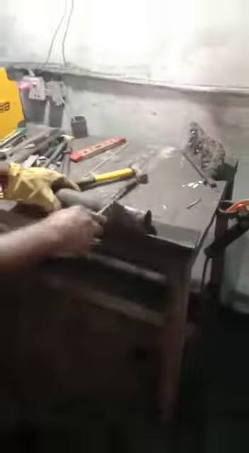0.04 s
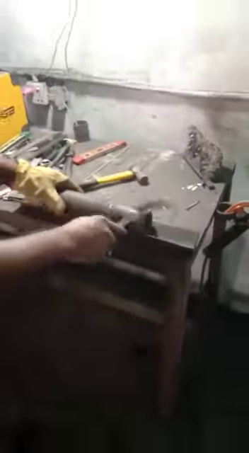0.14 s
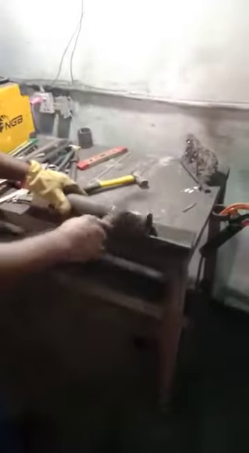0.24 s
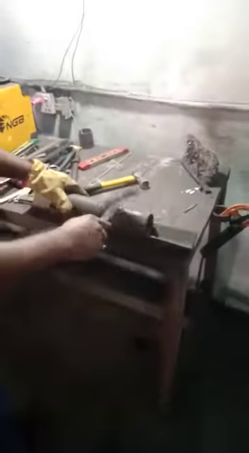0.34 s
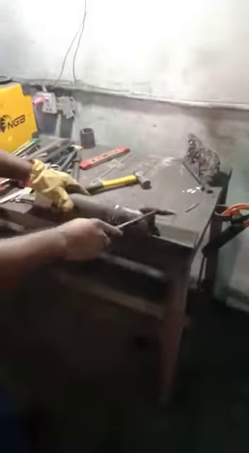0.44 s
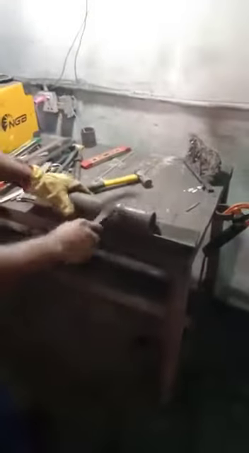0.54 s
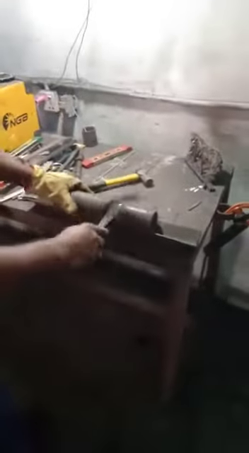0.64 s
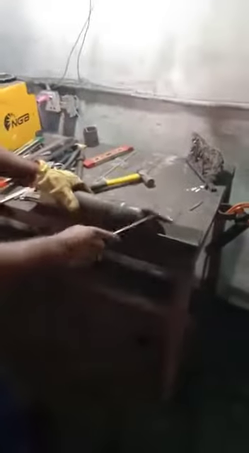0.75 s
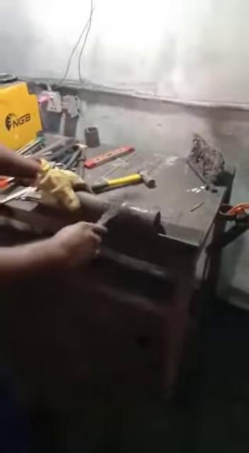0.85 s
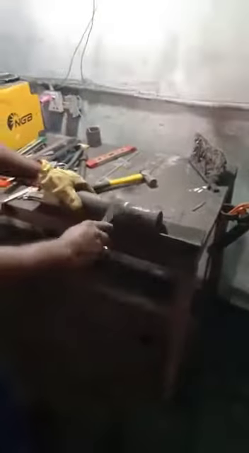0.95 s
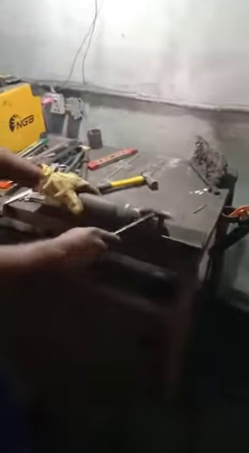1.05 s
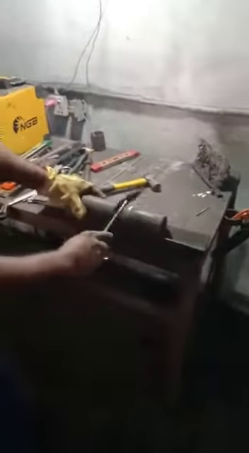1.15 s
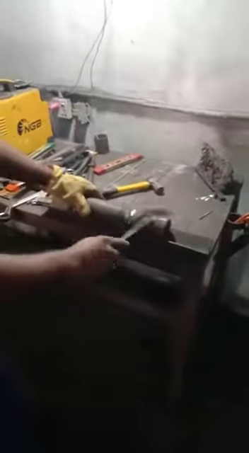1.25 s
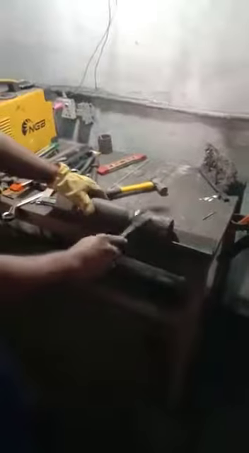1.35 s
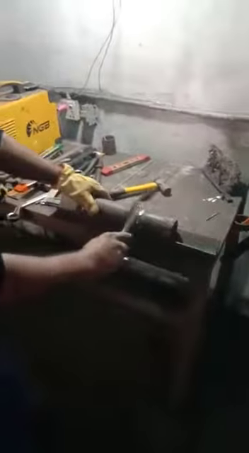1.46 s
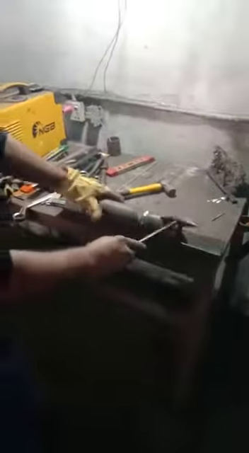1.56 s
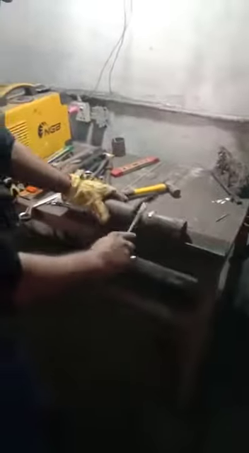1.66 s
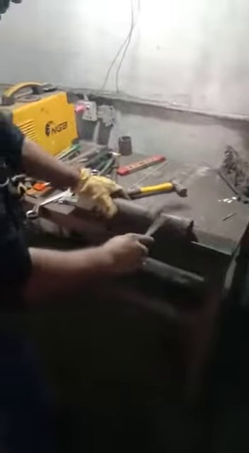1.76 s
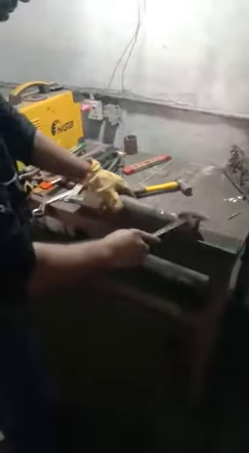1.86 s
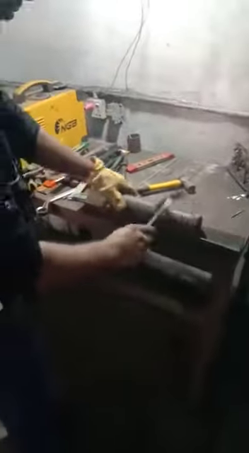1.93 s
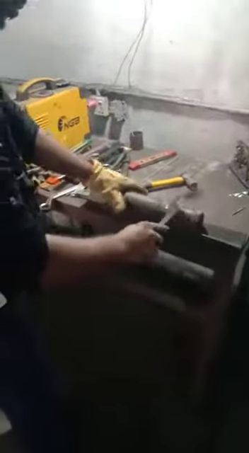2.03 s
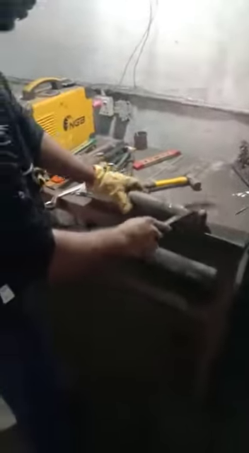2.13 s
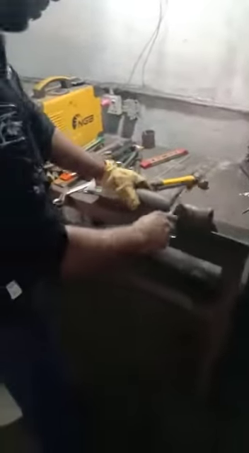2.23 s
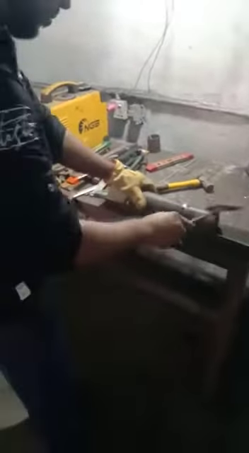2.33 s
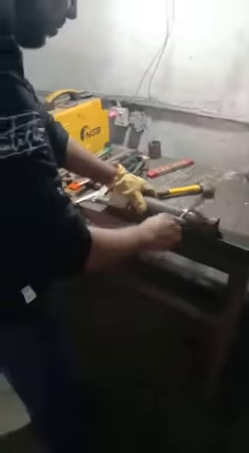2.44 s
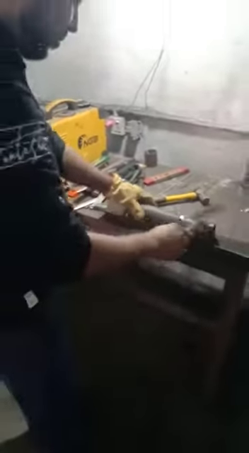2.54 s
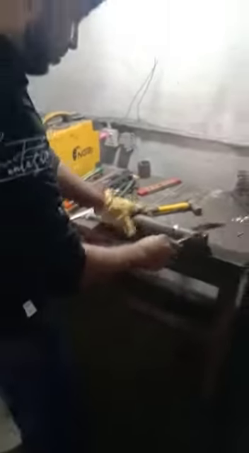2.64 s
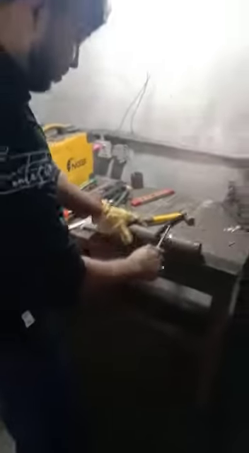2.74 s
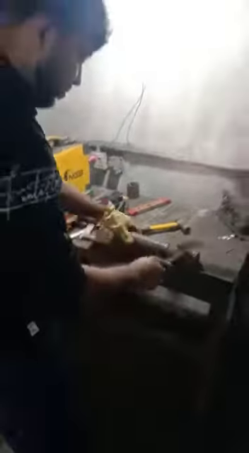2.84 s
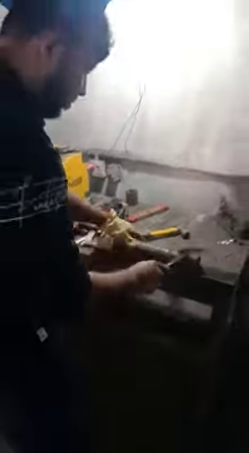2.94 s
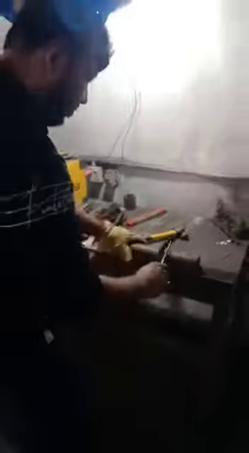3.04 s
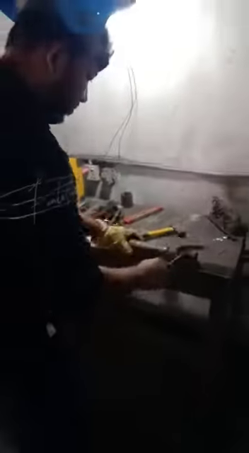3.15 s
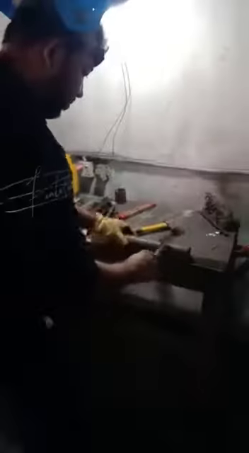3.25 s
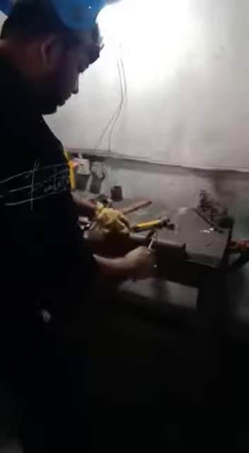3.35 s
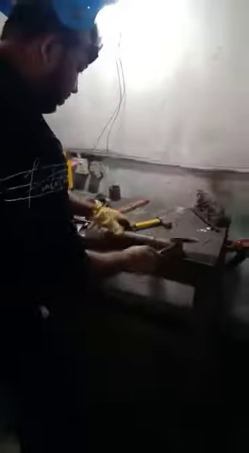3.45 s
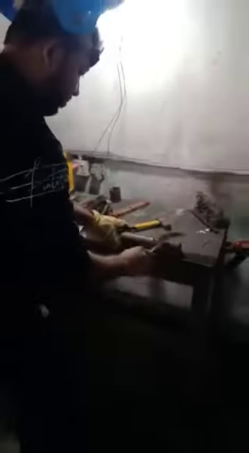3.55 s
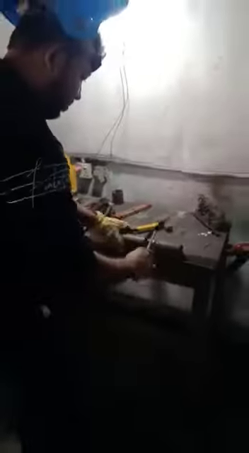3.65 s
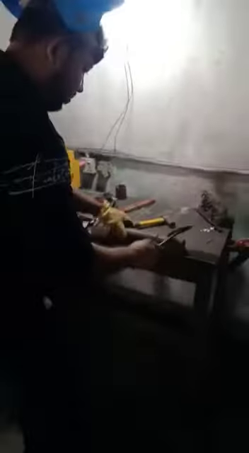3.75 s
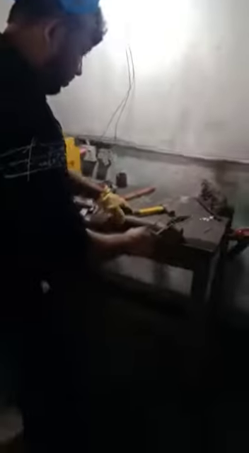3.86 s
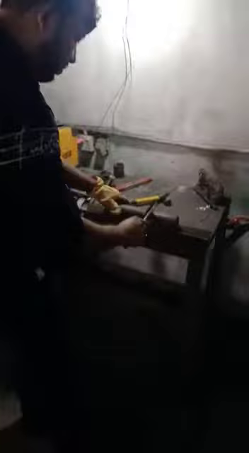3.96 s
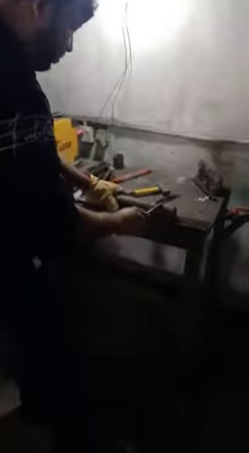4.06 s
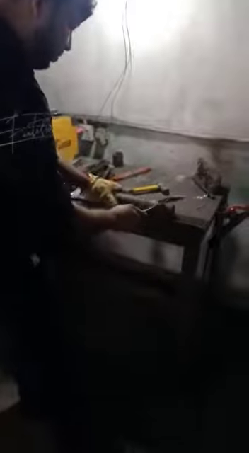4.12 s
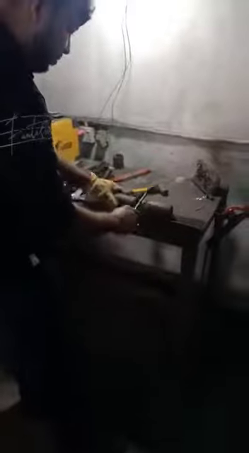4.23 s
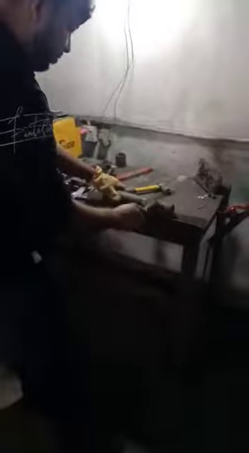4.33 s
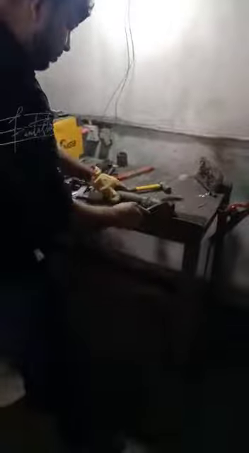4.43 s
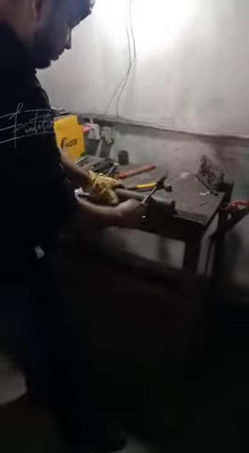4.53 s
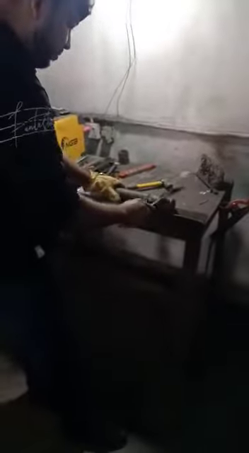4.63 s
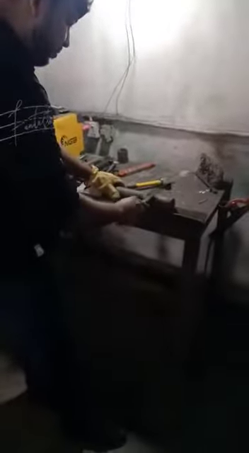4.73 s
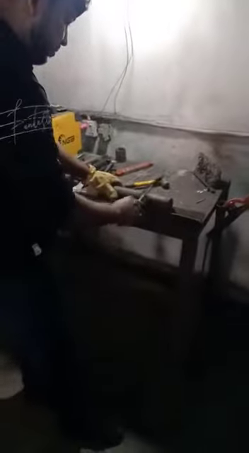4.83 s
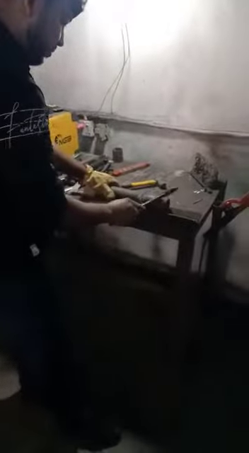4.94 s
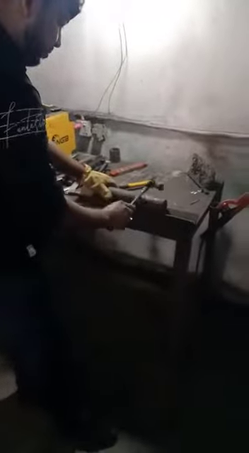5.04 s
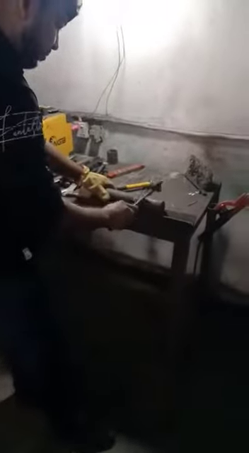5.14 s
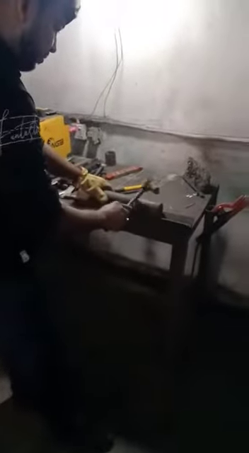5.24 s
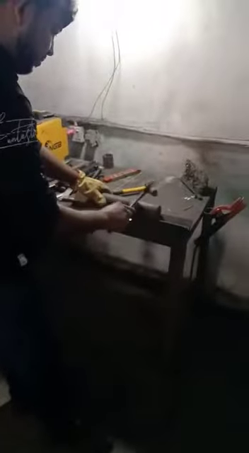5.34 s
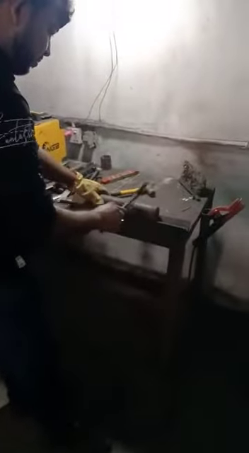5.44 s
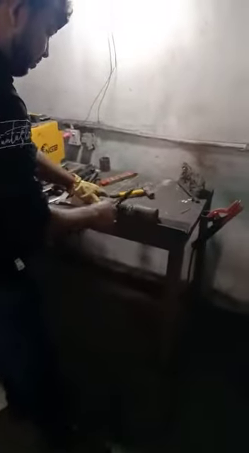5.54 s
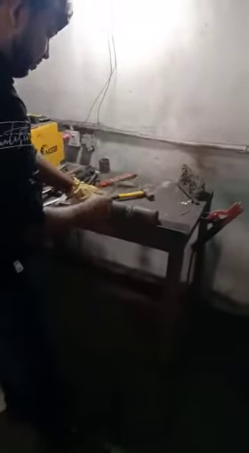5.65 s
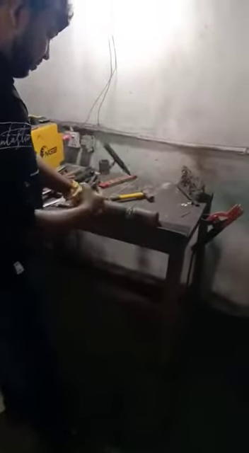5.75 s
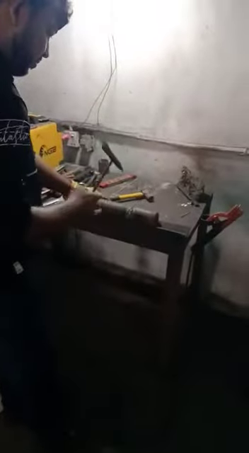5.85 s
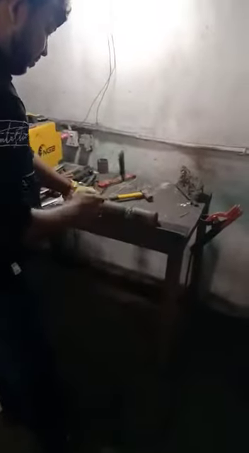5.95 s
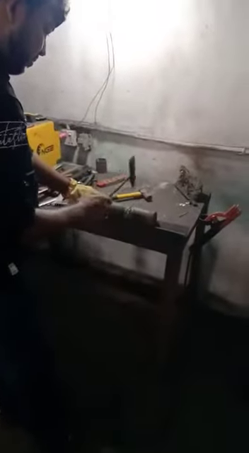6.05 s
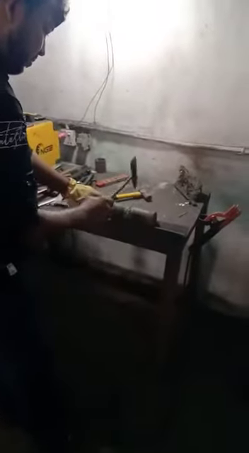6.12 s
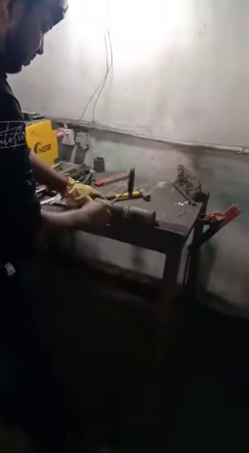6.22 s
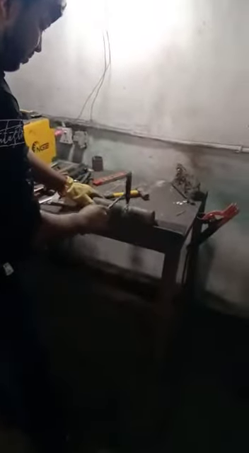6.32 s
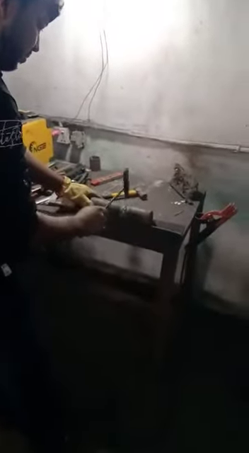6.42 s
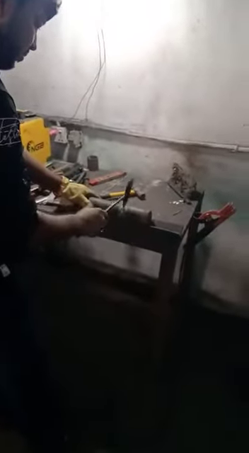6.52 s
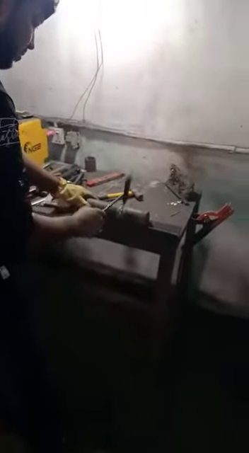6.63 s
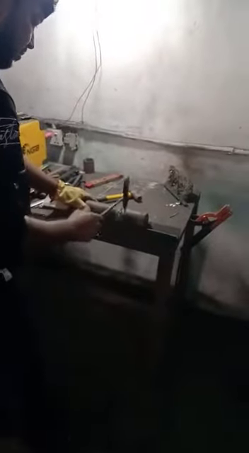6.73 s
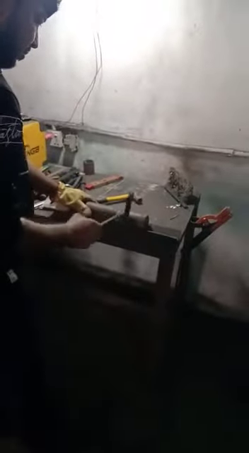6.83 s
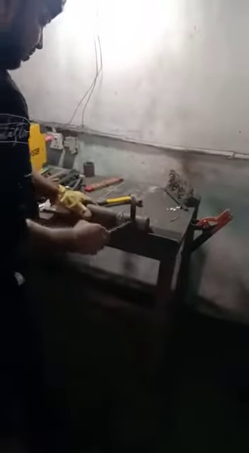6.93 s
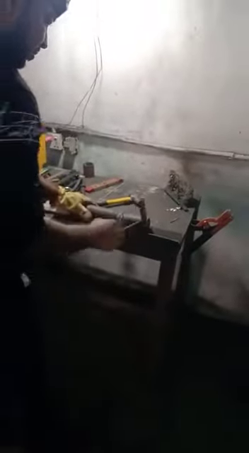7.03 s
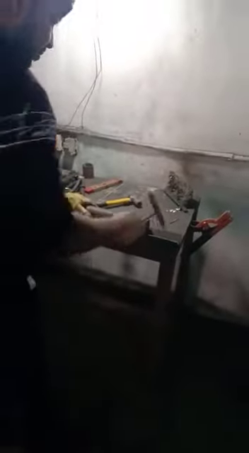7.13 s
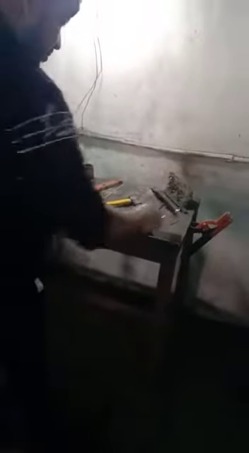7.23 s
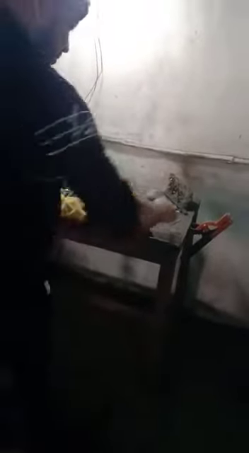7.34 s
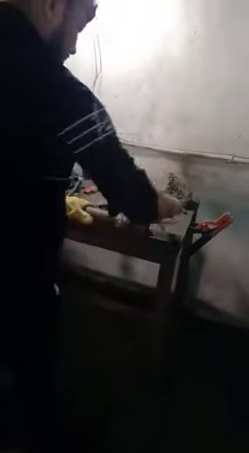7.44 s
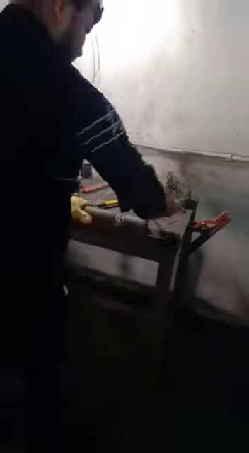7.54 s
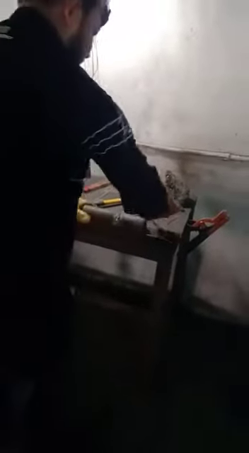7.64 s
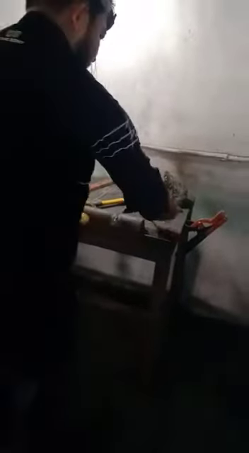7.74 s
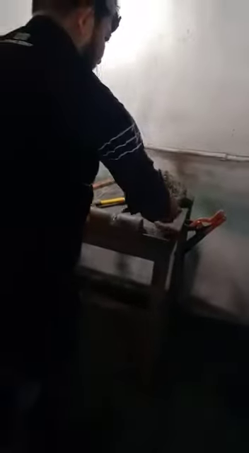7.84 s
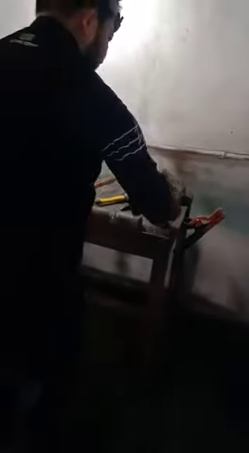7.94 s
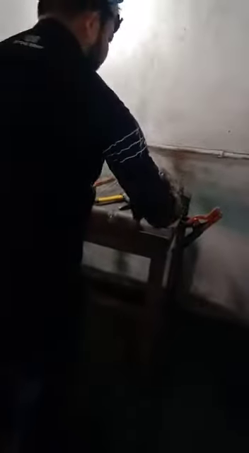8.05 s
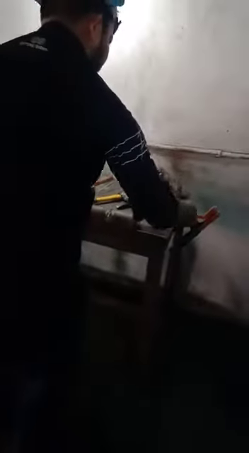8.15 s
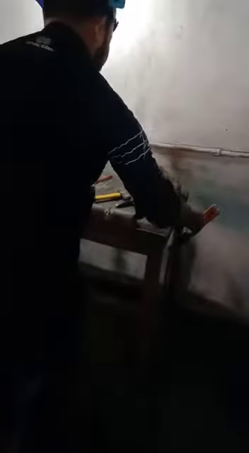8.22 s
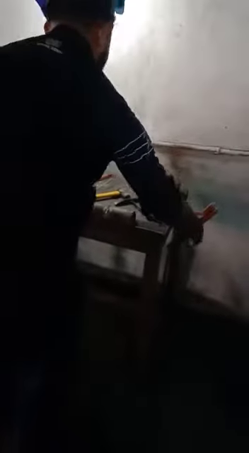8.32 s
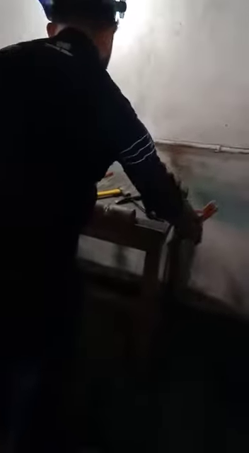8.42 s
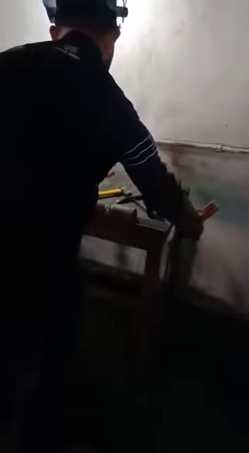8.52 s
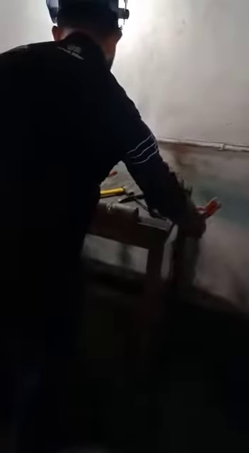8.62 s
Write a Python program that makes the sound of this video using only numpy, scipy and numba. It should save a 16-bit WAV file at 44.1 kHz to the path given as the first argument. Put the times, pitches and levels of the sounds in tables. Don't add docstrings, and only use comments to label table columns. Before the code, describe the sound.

Fast gritty metal scraping and tapping with bright steel ringing, a pause, two hard blows, then a tool clattering down over faint fan hiss.

```python
import sys
import numpy as np
from scipy import signal
from scipy.fft import rfft, irfft
from scipy.io import wavfile
from scipy.ndimage import uniform_filter1d
from numba import njit

SR = 44100
rng = np.random.default_rng(int(sys.argv[2]) if len(sys.argv) > 2 else 0)


def natural_amplitude(level_db):
    exponent = np.asarray(level_db, float) / 20
    return 10 ** exponent


def persist_wave(psi):
    counts = np.round(np.clip(psi, -1, 1) * 32767).astype(np.int16)
    wavfile.write(sys.argv[1], SR, np.atleast_2d(counts).T)


N = 382788

# pitch_hz, level_db
MIC = [(30, -28), (70, -14.5), (120, -3), (1000, -7), (1250, 3.5), (1550, -1.5), (3500, 9), (6200, 14),
       (7400, 16), (8600, 5), (10000, -9), (13000, -15.5), (15000, -3), (16000, -4)]


def shape(table, hz):
    at, value = np.transpose(table)
    return np.interp(np.log(np.maximum(hz, 1)), np.log(at), value)


def unit(x):
    return x / np.sqrt(np.mean(x ** 2))


def colour(x, table):
    size = 4096
    cep = irfft(np.log(natural_amplitude(shape(table, np.fft.rfftfreq(size, 1 / SR)))))
    cep[1:size // 2] *= 2
    cep[size // 2 + 1:] = 0
    return signal.fftconvolve(x, irfft(np.exp(rfft(cep))))[:N]


@njit
def ring(x, which, gains, poles):
    y = np.zeros(len(x))
    for m in range(poles.shape[1]):
        z = 0j
        for i in range(len(x)):
            z = z * poles[which[i], m] + gains[which[i], m] * x[i]
            y[i] += z.imag
    return y


def body(x, which, modes, contact_db, detune=0):
    hz, width, db = np.transpose(modes)
    radius = np.exp(-np.pi * width / SR)
    gains = natural_amplitude(contact_db + db - shape(MIC, hz)) * np.sqrt(1 - radius ** 2)
    tuned = hz * (1 + detune * rng.standard_normal(gains.shape))
    return ring(x + 1e-18, which, gains, radius * np.exp(2j * np.pi * tuned / SR))


def contact(table, grit_db):
    force, which = np.zeros(N), np.zeros(N, np.int64)
    for k, (s, db, rise_ms, fall_ms, *_) in enumerate(table):
        start = int(s * SR)
        ms = np.arange(min(N - start, SR // 3)) * 1000 / SR
        rise = np.sin(np.pi / 2 * np.clip(ms / max(rise_ms, 1), 0, 1))
        lift = np.exp(-(np.maximum(ms - rise_ms, 0) / max(1.346 * fall_ms, 2)) ** 1.04)
        force[start:start + len(ms)] += natural_amplitude(db) * rise ** 0.66 * lift
        which[start:] = k
    size = np.minimum(rng.exponential(size=N // 16 + 1), 3)
    grains = rng.standard_normal(N) * natural_amplitude(grit_db * np.repeat(size, 16)[:N])
    return force * unit(grains), which


def favoured(table, modes):
    octaves = abs(np.log2(np.array(modes)[:, 0] / np.array(table)[:, -1:]))
    nearest = octaves == octaves.min(axis=1, keepdims=True)
    return 10.5 * nearest


def struck(table, modes, scatter_db, ring_db, top_db, grit_db, lie_db=0):
    crunch, which = contact(table, grit_db)
    own_db, hz = np.array(table)[:, -2:-1], np.array(modes)[:, 0]
    group_db = own_db * np.where(hz < 8000, 1, .5) + top_db * (hz > 9500)
    scatter = scatter_db * np.where(hz < 9500, 1, 2) * rng.standard_normal((len(table), len(modes)))
    drive_db = ring_db + group_db + favoured(table, modes) + lie_db + scatter
    return crunch, body(crunch, which, modes, drive_db, detune=.002)


def strokes():
    # start_s, crunch_db, bite_ms, pipe_ring_db, favoured_mode_hz
    taps = [(0.0, -15, 13, -2, 7340), (0.095, -21, 5.1, -6.5, 2870), (0.689, -22, 32, -0.5, 7690),
            (0.831, -11.5, 22.6, -8.5, 2870), (0.962, -23, 53, -2, 3660), (1.091, -21.5, 64, 1, 7340),
            (1.363, -16.5, 31, -5, 7400), (1.816, -19.5, 88, -13, 2340), (2.207, -19, 18, -11, 2870),
            (2.909, -12, 33, -30, 3430), (3.107, -18.5, 17.4, 11, 7340), (3.233, -22.5, 15, -5, 2870),
            (3.576, -19, 38, -0.5, 2870), (3.828, -17, 17, -22, 7110), (4.313, -29, 4.8, 26, 4340),
            (4.478, -13, 18, -9, 2800), (4.727, -13.5, 14.6, -19, 7340), (4.852, -23.5, 12, 11, 2790),
            (5.011, -10.5, 13.5, -29, 2790), (5.227, -12.5, 16.3, -3.5, 7110), (5.3, -10.5, 5.9, -16, 2870)]
    # start_s, crunch_db, skid_ms, pipe_ring_db, favoured_mode_hz
    scrapes = [(0.226, -15, 41, -2.5, 7110), (0.357, -15.5, 21, -12, 7690), (0.47, -21, 52, -4, 7110),
               (1.216, -19.5, 50, -2, 7690), (1.45, -22, 70, -2, 7110), (1.595, -19.5, 54, -2.5, 7340),
               (1.707, -19.5, 71, 3, 2340), (1.894, -12, 8.5, -8, 7340), (2.008, -21, 47, 6.5, 3430),
               (2.149, -15.5, 19, -30, 7690), (2.247, -18, 47, -6, 7690), (2.403, -13.5, 7.6, -9, 7110),
               (2.52, -21.5, 23, 1, 7690), (2.647, -16.5, 48, -17, 3660), (2.767, -14.5, 54, -19, 3430),
               (2.959, -18.5, 23, -7, 2870), (3.255, -19.5, 19, 2, 2870), (3.384, -20, 32, 5, 3430),
               (3.534, -22.5, 15, 8, 2870), (3.68, -13.5, 49, -32, 6170), (3.886, -19.5, 32, 10, 2340),
               (4.024, -21.5, 7.6, 7, 2340), (4.15, -22.5, 42, 9, 7110)]
    # start_s, crunch_db, bite_ms, pipe_ring_db
    chatter = [(0.042, -22, 68, -11), (0.172, -33, 36, -16), (0.512, -18, 8.6, -5), (0.528, -22, 88, 6),
               (0.64, -26, 83, -1), (0.81, -20, 7.9, 2.5), (0.874, -30, 34, -4), (0.917, -26.5, 50, -18),
               (1.288, -22, 4.8, 7), (1.981, -17, 13, -12), (2.431, -18.5, 49, -29), (2.709, -25, 36, -24),
               (3.085, -24.5, 3.3, -2), (3.173, -28, 46, 8), (3.311, -23.5, 22, -21), (3.486, -53, 38, -2),
               (3.554, -27, 2.6, -1), (3.932, -19.5, 17, -20), (4.244, -24.5, 25, -2), (4.274, -42, 17, -1),
               (4.338, -21, 76, 4.5), (4.539, -22.5, 15, 4), (4.579, -22.5, 190, -20),
               (4.752, -18, 2.3, 0.5), (4.883, -25, 81, 2), (5.045, -19, 18, -15), (5.085, -22, 30, -15),
               (5.355, -37, 32, 12.5), (5.44, -28, 16, -11), (5.511, -48, 42, 6)]
    tap_rise_ms, rebound_rise_ms, scrape_bite_ms = 4, 3, 14.2
    rows = [(s, db, ms, scrape_bite_ms, ring_db, hz) for s, db, ms, ring_db, hz in scrapes]
    rows += [(s, db, tap_rise_ms, ms, ring_db, hz) for s, db, ms, ring_db, hz in taps]
    rows.sort()
    rebounds = []
    for s, db, ms, ring_db in chatter:
        spot_hz = [row[-1] for row in rows if row[0] < s][-1]
        rebounds.append((s, db, rebound_rise_ms, ms, ring_db, spot_hz))
    return sorted(rows + rebounds)


def lie(table, modes):
    # start_s, end_s
    turned = [(1.7, 2.1), (3.85, 5.6)]
    flat_hz, turned_hz, swap_db = [2875, 5640, 7695], [2340, 2790, 3005, 7100], 3
    s, hz = np.array(table)[:, :1], np.array(modes)[:, 0]
    side = 2 * sum((s >= start) & (s < end) for start, end in turned) - 1
    return swap_db * side * (1. * np.isin(hz, turned_hz) - np.isin(hz, flat_hz))


def hammer_on_pipe():
    pipe_hz = [2340, 2790, 2875, 3005, 3430, 3657, 4340, 5210, 5640, 6180, 7100, 7342, 7695, 8070, 8355,
               9173, 10010, 10750, 11120, 11540, 11750, 12140, 13400, 13780, 14480, 15470]
    pipe_db = [2.5, 2.5, 6, 3, 1, 1, 0.5, -16, 8, 7, 4.5, -2, 3.5, -27, 5.5, -4, -20, -46, -46, -34, -18.5,
               -46, -24, -20, -26, -15]
    loss = 0.011
    modes = [(hz, loss * hz, db) for hz, db in zip(pipe_hz, pipe_db)]
    table = strokes()
    return struck(table, modes, scatter_db=2.2, ring_db=-18.5, top_db=4.0, grit_db=2.0,
                  lie_db=lie(table, modes))


def bench(crunch):
    # start_s, pressed_to_frame_db, plate_left_free_db
    seating = [(0, 5, -8), (.5, 0, 1.5), (.95, -1.5, -10.5), (1.2, 4.5, -2), (1.45, -17, 6), (1.7, 2, -4),
               (2.2, 4.5, -0.5), (2.5, 5.5, 4), (3.1, 3.5, -2), (3.4, -7.5, -17), (4.0, 9.5, 3),
               (4.35, -8, -6), (4.6, -3, -15), (4.9, -7.5, 6.5), (6.3, 0.5, -3), (7.6, 2, -7),
               (7.95, -8, -5), (8.5, -23, 4)]
    # pitch_hz, width_hz, level_db
    frame = [(151, 20, -8), (123, 39, -23), (174, 27, -15)]
    # pitch_hz, width_hz, level_db
    bench_top = [(297, 83, -15), (355, 11, -13), (510, 1080, 1), (800, 1400, -20)]
    # pitch_hz, width_hz, level_db
    plate = [(1255, 40, -5), (1289, 24, -4), (1360, 180, -13)]
    s, press, free = np.transpose(seating)
    t, same = np.arange(N) / SR, np.zeros(N, np.int64)
    steel = 0
    for modes, drive_db, share_db in ((frame, press, -14.5), (bench_top, press, -14.5), (plate, free, -9.5)):
        push = crunch * natural_amplitude(np.interp(t, s, drive_db))
        steel = steel + body(push, same, modes, np.full((1, 1), share_db))
    return signal.sosfilt(signal.butter(2, 110, "high", fs=SR, output="sos"), steel)


def room(x):
    # pitch_hz, fade_s
    fade = [(100, 1.2), (400, 1.74), (1500, 1.3), (5000, 1.58), (9000, 0.65), (16000, 0.63)]
    direct_db, tail_db, early_db, early_ms = 1.5, -5, -1.5, 38.6
    t = np.arange(int(1.5 * SR)) / SR
    hz, at, noise = signal.stft(rng.standard_normal(len(t)), SR, nperseg=256)
    fading = noise * natural_amplitude(-60 * at / shape(fade, hz)[:, None])
    tail = signal.istft(fading, SR, nperseg=256)[1][:len(t)]
    tail *= 1 - np.exp(-t / 0.0018)
    early = rng.standard_normal(len(t)) * np.exp(-t * 1000 / early_ms)
    echo = natural_amplitude(tail_db) * tail / np.linalg.norm(tail)
    echo += natural_amplitude(early_db) * early / np.linalg.norm(early)
    return natural_amplitude(direct_db) * x + signal.fftconvolve(x, echo)[:N]


def fan():
    # pitch_hz, level_db
    air = [(60, 13), (200, 5.5), (350, 1), (800, 13), (3000, -3.5), (16000, -12)]
    # pitch_hz, level_db
    hums = [(209.9, -59.5), (624.5, -60)]
    drift = uniform_filter1d(rng.standard_normal(N), SR // 5)
    hiss = colour(rng.standard_normal(N), air) * natural_amplitude(.7 * unit(drift))
    hiss *= natural_amplitude(-39.5) / np.std(colour(hiss, MIC))
    t = np.arange(N) / SR
    return hiss + sum(natural_amplitude(db + 1.0) * np.sin(2 * np.pi * hz * t) for hz, db in hums)


def handling():
    # start_s, level_db, fall_ms, pitch_hz
    pings = [(0.7, -26, 55, 2850), (1.235, -17.5, 43, 2812), (2.21, -18.5, 49, 2875), (2.53, -22, 44, 2915),
             (3.26, -17.5, 27, 3430), (3.389, -18.5, 24, 2830), (4.314, -21, 32, 7740),
             (4.03, -19, 21, 6250), (4.16, -22, 23, 5230), (4.17, -25, 37, 2290), (4.93, -25, 21, 7700),
             (1.756, -15, 17, 2350), (1.756, -18, 8.5, 3460), (3.106, -17.5, 13, 3520),
             (4.48, -27, 67, 279), (5.31, -31, 74, 2800), (5.435, -27, 17, 8160), (5.44, -45, 15, 11700),
             (7.974, -26.5, 43, 340), (8.126, -23.5, 61, 337)]
    # start_s, level_db, rise_ms, fall_ms, pitch_hz
    drags = [
        (7.04, -43.5, 96, 36, 392),
        (7.09, -36, 11, 41, 800),
        (7.2, -37.5, 15, 24, 440),
        (7.45, -39, 12, 30, 864),
        (7.452, -31, 17, 14, 1180),
        (7.66, -23.5, 55, 58, 299),
        (8.659, -32, 3.4, 19, 1010),
        (8.661, -42, 3.2, 14, 1220),
    ]
    drag_loss, ping_rise_ms = 0.089, 2.3
    rows = [(*row, drag_loss * row[-1]) for row in drags]
    rows += [(s, db, ping_rise_ms, ms, hz, 11 + .009 * hz) for s, db, ms, hz in pings]
    out, same = 0, np.zeros(N, np.int64)
    for row in rows:
        hz, width = row[-2:]
        rub, _ = contact([row], grit_db=3.0)
        out = out + body(rub, same, [(hz, width, 0)], np.zeros((1, 1)))
    return out


def dropped_parts():
    # start_s, crunch_db, bite_ms, ring_db, favoured_mode_hz
    clatter = [(6.258, -11.5, 26, -19, 7300), (6.478, -9, 18, -9.5, 7300), (6.558, -19.5, 35, -22, 7300),
               (7.075, -34.5, 160, -12, 1800), (7.528, -12, 63, -15, 6300), (7.683, -22, 40, -30, 2660),
               (7.732, -29, 23, -26, 2660), (7.951, -11, 11.4, -7.5, 2176), (8.037, -13, 8.7, -10, 2176),
               (8.107, -15, 20, -11, 6300), (8.16, -23.5, 20, -12, 2176), (8.2, -29, 23, -10, 1800),
               (8.233, -27, 15, -1.5, 2176), (8.653, -49, 11, -6, 2660)]
    # pitch_hz, width_hz, level_db
    parts = [(1800, 98, -8), (2176, 550, 1), (2660, 310, -15.5), (3760, 120, -34), (4440, 120, -12),
             (6300, 170, 2), (7300, 830, 8)]
    rise_ms = 7
    drops = [(s, db, rise_ms, *rest) for s, db, *rest in clatter]
    return struck(drops, parts, scatter_db=4, ring_db=-11.0, top_db=3.5, grit_db=3.5)


def scene():
    # pitch_hz, level_db
    slag = [(80, -8.5), (300, 2), (1000, 6.5), (5000, -11.5), (16000, -16.5)]
    crunch, pipe = hammer_on_pipe()
    knock, parts = dropped_parts()
    blows = crunch + knock
    steel = pipe + parts + bench(blows) + handling()
    return (room(natural_amplitude(-3) * (colour(blows, slag) + steel)) + fan())[None]


@njit
def follow(x, attack, release):
    y, e = np.empty(len(x)), 0.
    for i in range(len(x)):
        e += (x[i] - e) * (attack if x[i] > e else release)
        y[i] = e
    return y


def top_cut(x):
    return signal.sosfilt(signal.butter(12, 16840, fs=SR, output="sos"), x)


def record(dry):
    limit_db, ratio, ahead_ms = -22, 1.354, 4
    x = colour(dry[0], MIC)
    level = follow(np.abs(x), 1 / (.004 * SR), 1 / (.06 * SR))
    gain = np.minimum(natural_amplitude(limit_db) / (level + 1e-9), 1) ** (1 - 1 / ratio)
    x = x * np.interp(np.arange(N) + ahead_ms * SR / 1000, np.arange(N), gain)
    x = .54 * np.tanh(x / .54)
    x = signal.sosfilt(signal.ellip(10, .3, 80, 15800, fs=SR, output="sos"), x)
    return top_cut(x[None])


dry = scene()
out = record(dry)
persist_wave(out)
```